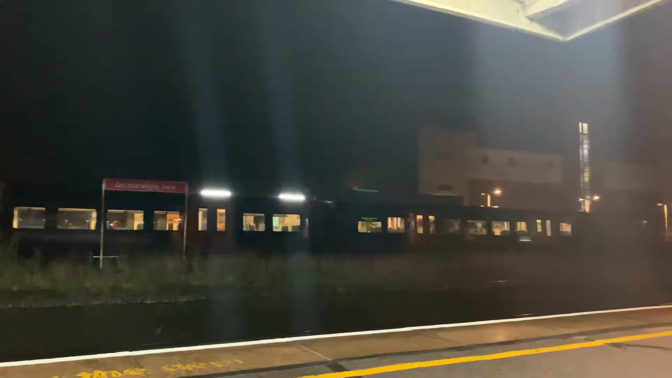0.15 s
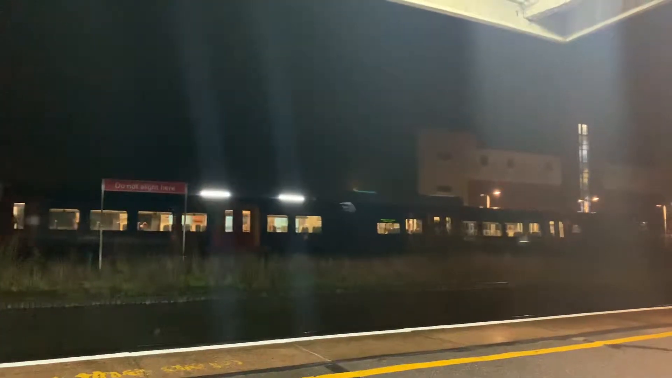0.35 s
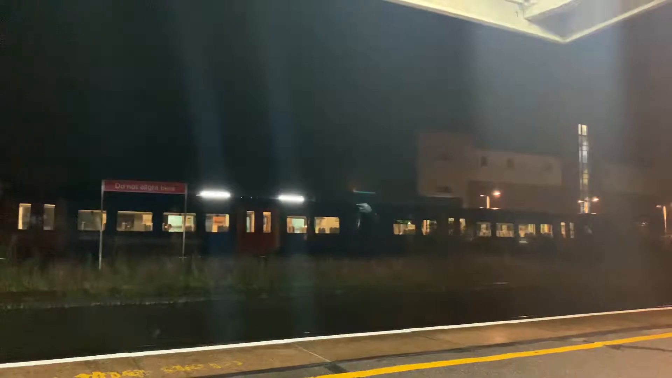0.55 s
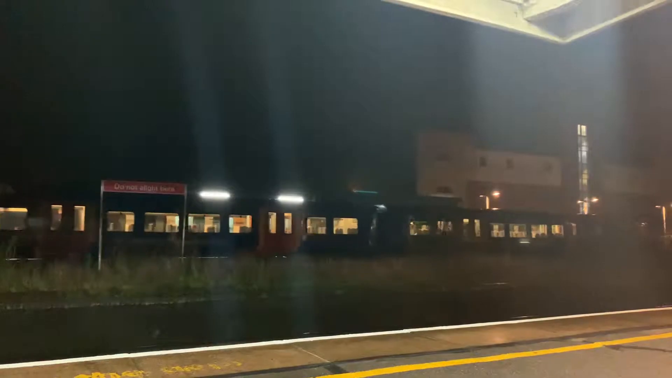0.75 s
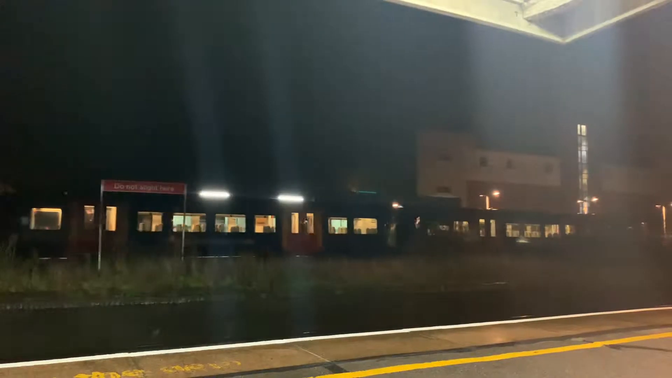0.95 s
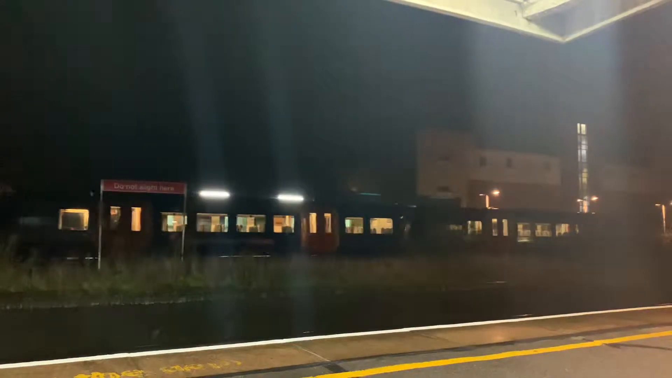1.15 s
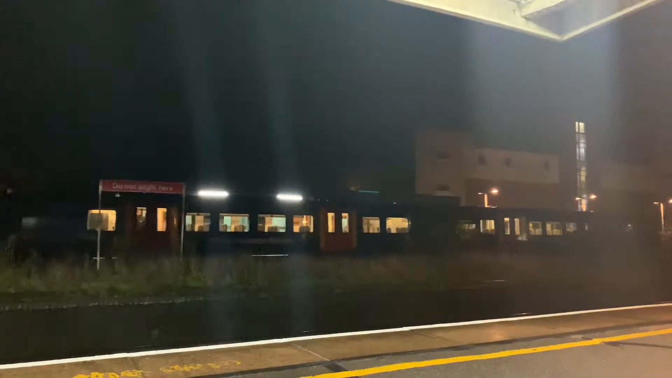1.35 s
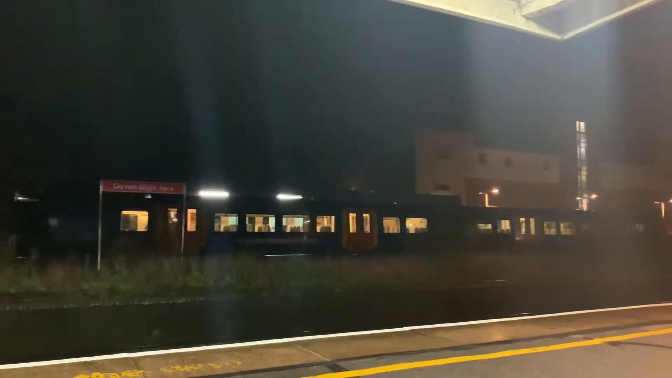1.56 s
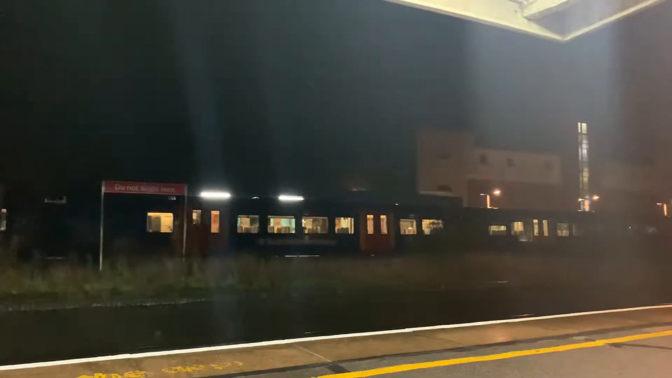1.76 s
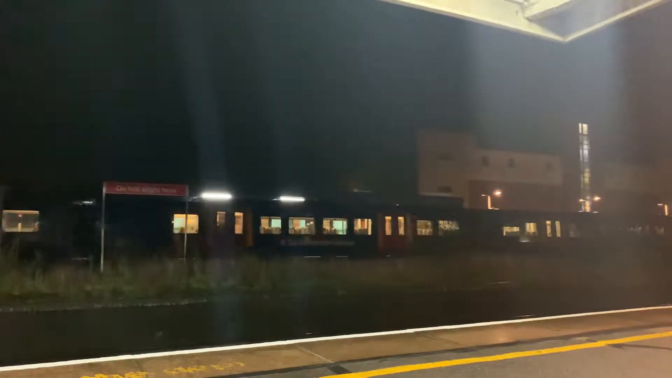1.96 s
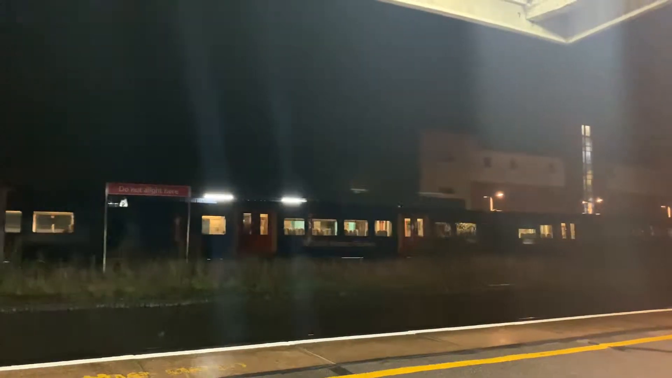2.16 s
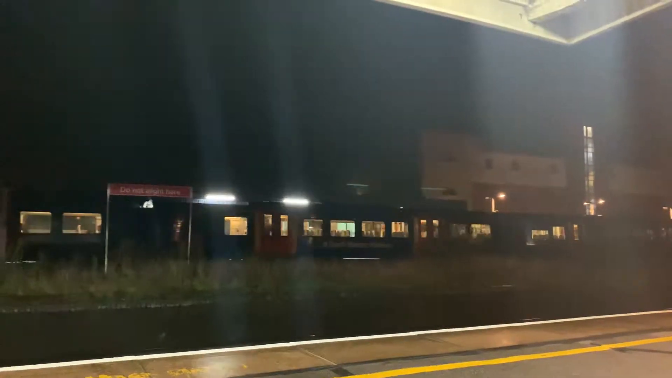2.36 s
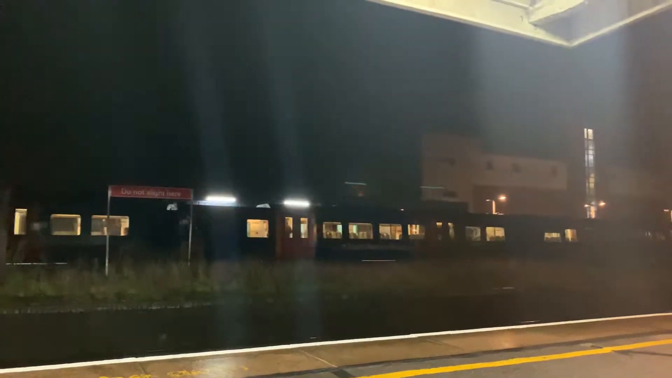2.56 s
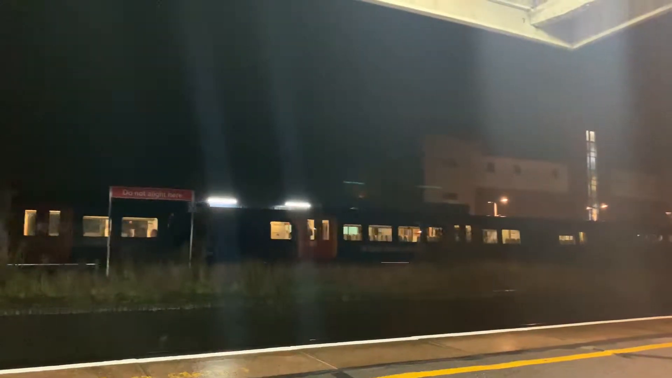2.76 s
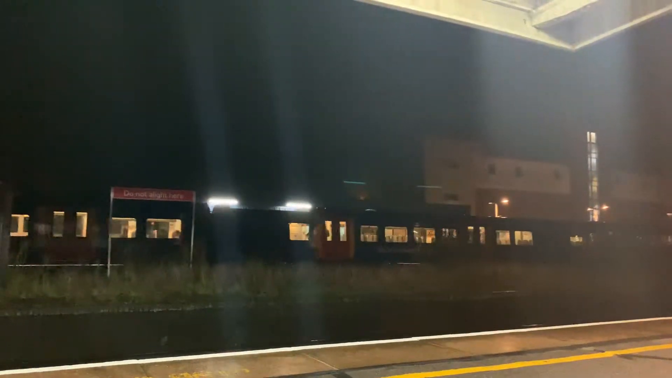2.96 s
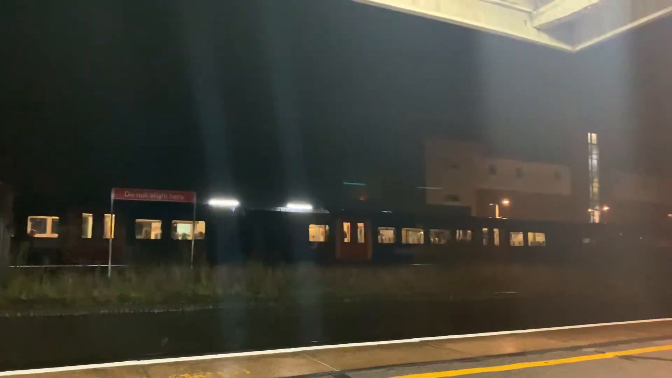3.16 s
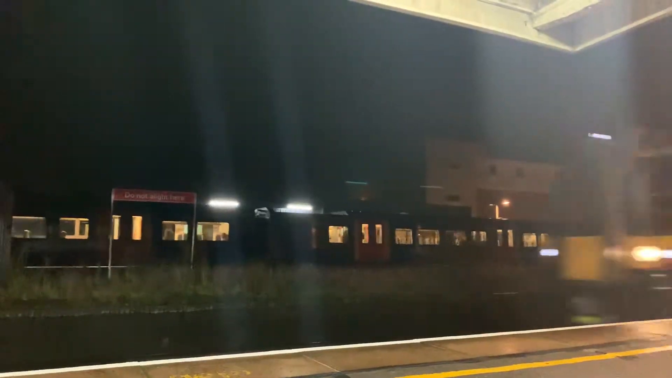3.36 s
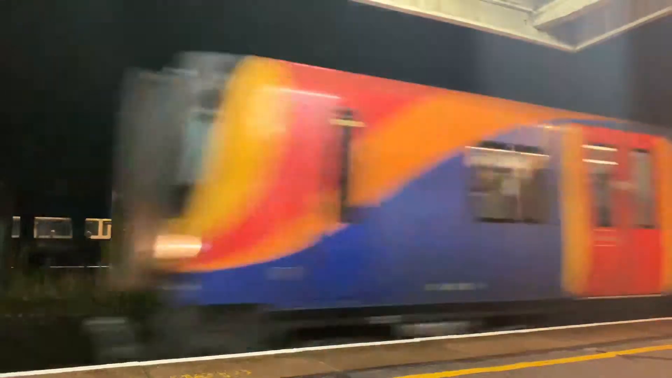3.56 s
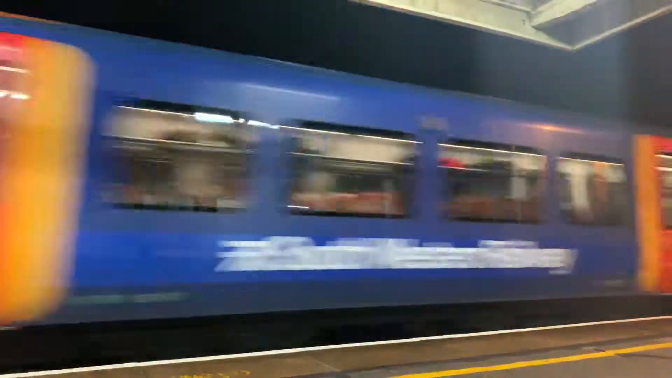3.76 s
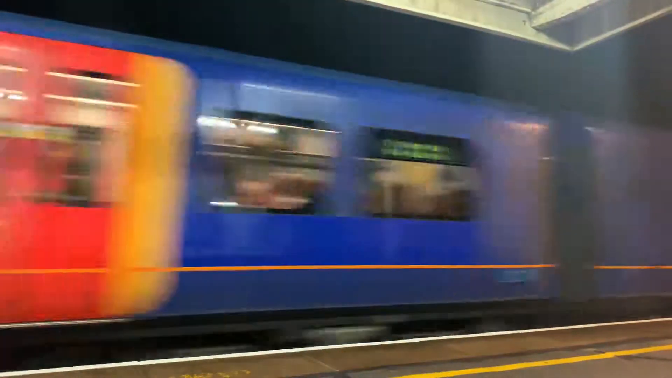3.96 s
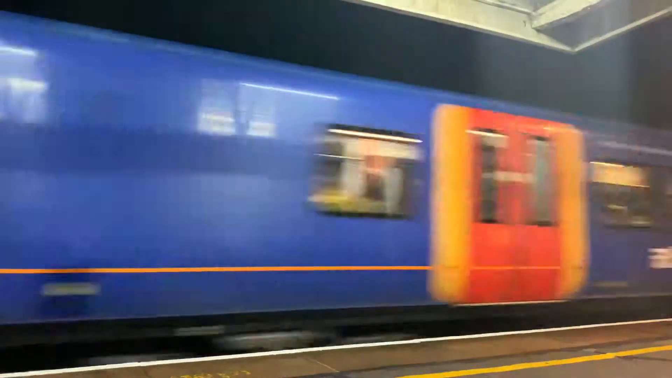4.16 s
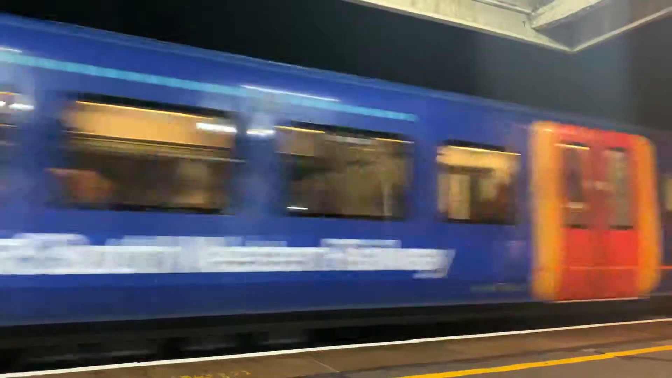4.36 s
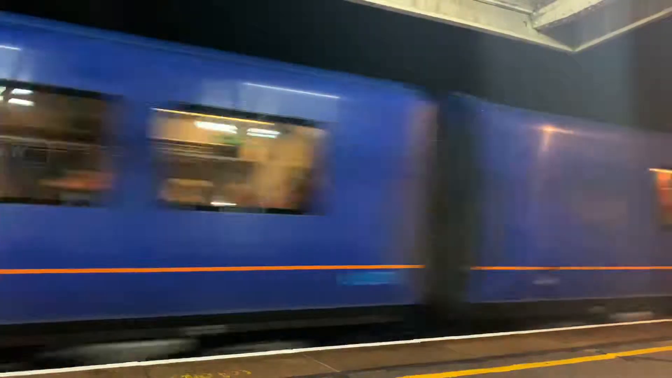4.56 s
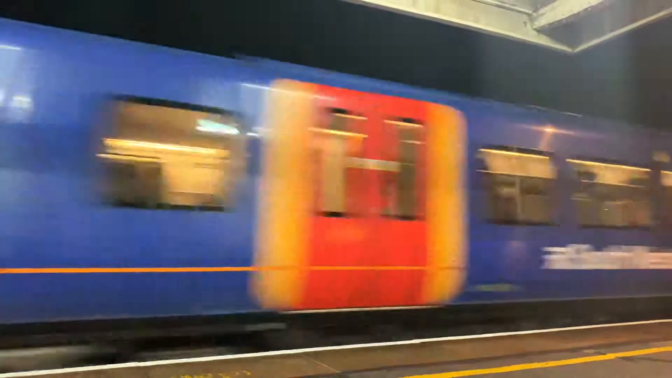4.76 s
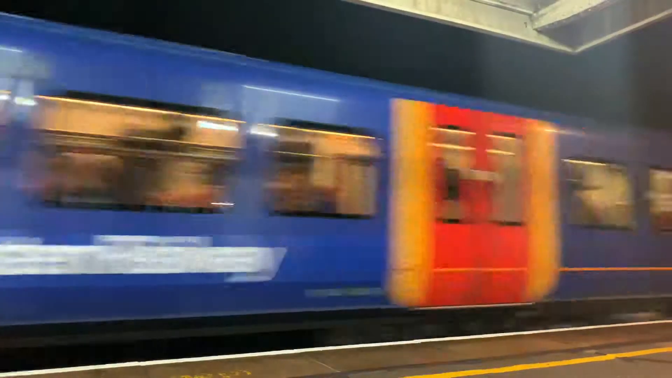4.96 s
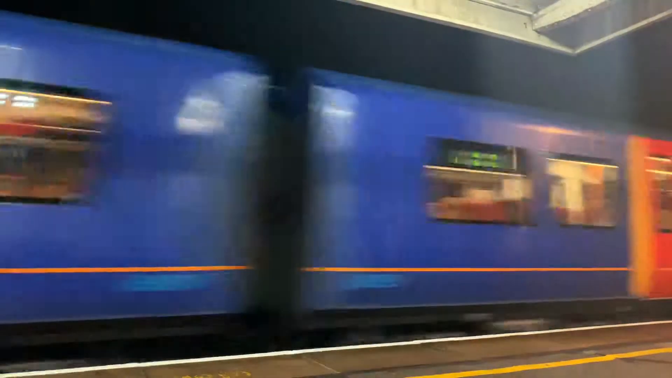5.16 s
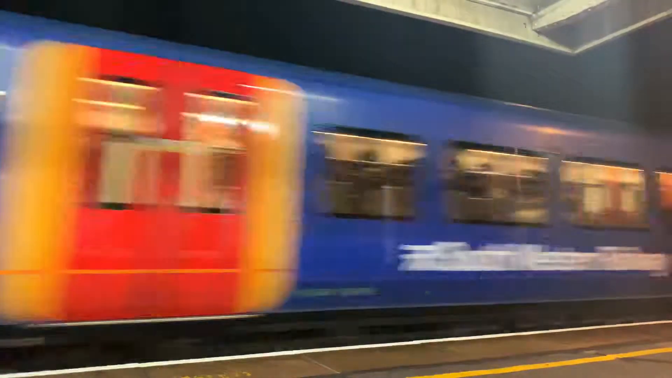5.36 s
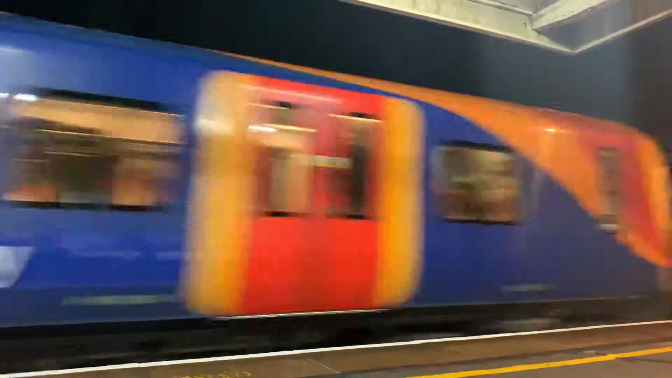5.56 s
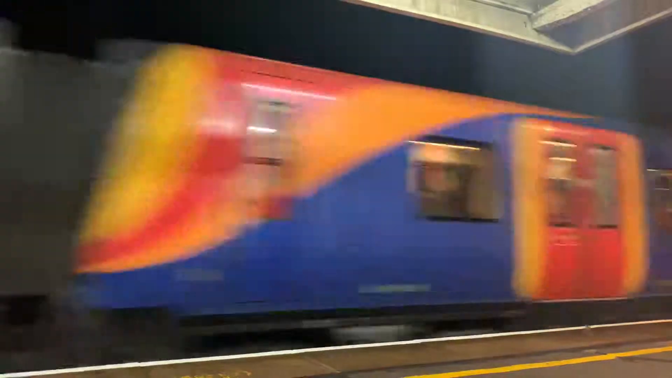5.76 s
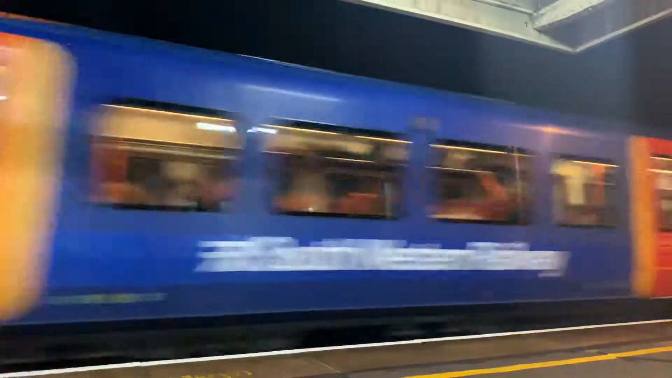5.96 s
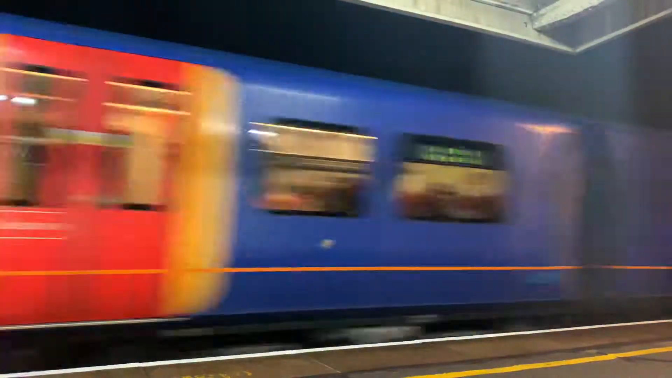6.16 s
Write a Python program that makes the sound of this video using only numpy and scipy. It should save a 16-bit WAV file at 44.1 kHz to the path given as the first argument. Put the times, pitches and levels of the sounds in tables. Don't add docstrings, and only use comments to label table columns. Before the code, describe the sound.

A handheld phone on a station platform first catches dull, distant train rumble and a wavering high whine. Four axles of an approaching train clack over a joint, each blow followed by bright sizzling rail hiss. Singing rails swell steeply into a loud, wide rush of wheels alongside, rough and fluttering, with heavy bass, ringing steel and irregular knocks; it never recedes.

```python
import sys
import numpy as np
from scipy import signal
from scipy.fft import rfft, irfft, next_fast_len
from scipy.io import wavfile
from scipy.ndimage import uniform_filter1d

SR = 44100
rng = np.random.default_rng(int(sys.argv[2]) if len(sys.argv) > 2 else 0)


def dump_mix(stems):
    frames = np.atleast_2d(stems).T
    limited = np.clip(frames, -1, 1)
    pcm = np.round(limited * 32767).astype(np.int16)
    wavfile.write(sys.argv[1], SR, pcm)


def makeup_ratio(level_db):
    decades = np.asarray(level_db, float) / 20
    return 10 ** decades


N = 274107

SIZE = next_fast_len(N)
HZ = np.fft.rfftfreq(SIZE, 1 / SR)


def along(table, x):
    first, *rest = np.transpose(table)
    return [np.interp(x, first, column) for column in rest]


def colour_db(points, hz):
    point_hz, point_db = np.transpose(points)
    return np.interp(np.log(hz + 1), np.log(point_hz), point_db)


# pitch in Hz, left minus right in dB.
PORT_SHADE = [(60, 0), (150, -1.7), (300, 0), (800, 1.7), (2500, 1), (5000, -3.5), (7000, 0), (16000, 0)]
# pitch in Hz, share from 0 to 1,
# left port's delay in half cycles.
CASE_PATH = [(400, 0, 0), (700, .35, 0), (1100, 0, 0), (5900, 0, -.5), (7300, .42, -.1), (8300, .7, .2),
             (9600, .96, .72), (10600, .96, 1), (13750, .96, 2), (16000, .96, 2.75)]


def two_ports(lag):
    case, half_turns = along(CASE_PATH, HZ)
    through_air = (1 - case) * np.exp(-2j * np.pi * HZ * lag / SR)
    through_case = case * np.exp(-1j * np.pi * half_turns)
    left = (through_air + through_case) / np.hypot(case, 1 - case)
    shade = makeup_ratio(colour_db(PORT_SHADE, HZ) / 2)
    return np.array([left * shade, 1 / shade])


def heard(x, lag):
    return irfft(rfft(x, SIZE) * two_ports(lag), SIZE)[:, :N]


def noise_spectrum():
    return rng.standard_normal((len(HZ), 2)) @ [1, 1j]


# pitch in Hz, unrelated part in dB.
LOOSE_BASS = [(30, -28), (80, -26), (160, -13), (300, -17), (500, -45)]


def scattered(shape_db, ways):
    total = sum(makeup_ratio(2 * db) for _, db in ways)
    waves = sum(makeup_ratio(db) * two_ports(lag) * noise_spectrum() for lag, db in ways)
    waves += np.sqrt(total) * makeup_ratio(colour_db(LOOSE_BASS, HZ)) * noise_spectrum() * [[1], [-1]]
    power = total * 2 / SIZE
    return irfft(waves * makeup_ratio(shape_db) / np.sqrt(power), SIZE)[:, :N]


PART_BORDERS_HZ = [400, 1600, 2800]


def by_part(values, hz):
    borders = np.outer(PART_BORDERS_HZ, [.88, 1.12]).ravel()
    place = np.interp(hz, borders, np.repeat(np.arange(len(values)), 2)[1:-1])
    low = np.minimum(place.astype(int), len(values) - 2)
    share = (place - low).reshape((-1,) + (1,) * (np.ndim(values) - 1))
    return (1 - share) * values[low] + share * values[low + 1]


def roughness(points, rings, ways):
    db = colour_db(points, HZ)
    db += sum(gain_db / (1 + (2 * (HZ - hz) / width) ** 2) for hz, width, gain_db in rings)
    part = np.searchsorted(PART_BORDERS_HZ, HZ)
    part_db = 10 * np.log10(np.bincount(part, makeup_ratio(2 * db)) / len(HZ))
    return scattered(db - by_part(part_db, HZ), ways)


# pitch in Hz, level in dB per Hz.
FAR_COLOUR = [(20, 0), (45, 2), (100, -0.5), (150, -6.5), (350, -11), (500, -19), (1000, -18.5),
              (1500, -21), (2200, -25), (3000, -31.5), (6000, -43.5), (8300, -50), (10000, -75),
              (16500, -64)]
# pitch in Hz, width in Hz, boost in dB.
FAR_PEAKS = [(96, 23, 0), (1906, 220, 5.5), (2550, 95, 8), (5350, 1600, 2.5), (6650, 550, 5.5),
             (11600, 200, 21), (14000, 2500, 4)]
# left port's delay in samples, level in dB.
FAR_DIRECTIONS = [(12.5, -5.5), (4, -5.5), (-8.5, -9.5), (-20.5, -9.5)]


def slow_train():
    return roughness(FAR_COLOUR, FAR_PEAKS, FAR_DIRECTIONS)


# pitch in Hz, level in dB per Hz.
COMING_COLOUR = [(20, -5), (50, -2), (90, -4), (170, -5.5), (320, -6), (450, -13), (1000, -12.5),
                 (1600, -15), (2300, -11), (3300, -28.5), (5600, -31), (8000, -33), (11000, -37.5),
                 (16500, -44.5)]
# pitch in Hz, width in Hz, boost in dB.
COMING_RESONANCES = [(587, 21, 7), (1884, 340, 11.5), (2560, 150, 7.5), (6600, 1800, -0.5)]


def fast_train_coming():
    return roughness(COMING_COLOUR, COMING_RESONANCES, FAR_DIRECTIONS)


# pitch in Hz, level in dB per Hz.
NEAR_COLOUR = [(20, -1), (60, 0.5), (150, -3), (300, -1.5), (480, -6), (750, -8.5), (1300, -8.5),
               (1550, -12), (2600, -19.5), (2900, -18.5), (3500, -18.5), (5600, -22), (9000, -24),
               (16500, -33.5)]
# pitch in Hz, width in Hz, boost in dB.
NEAR_RESONANCES = [(90, 7.1, -1.5), (242, 200, 1.5), (567, 66, 6.5), (642, 36, 6.5), (818, 54, 3.5),
                   (1130, 310, 5.5), (2260, 23, 5.5), (2440, 390, 4.5), (4630, 930, 0.5)]
# left port's delay in samples, level in dB.
NEAR_DIRECTIONS = [(-19.5, -1), (-11, -5.5), (-1.5, -2.5), (8, -2), (18.5, -8.5)]


def coaches_alongside():
    return roughness(NEAR_COLOUR, NEAR_RESONANCES, NEAR_DIRECTIONS)


def patches(shape, frames, bins):
    field = rng.standard_normal(shape)
    for _ in range(2):
        field = uniform_filter1d(field, frames, axis=1)
        field = uniform_filter1d(field, bins, axis=0)
    return field / field.std()


# track, rail, wheel, hiss.
# The slow train, in dB.
SLOW_TRAIN_DB = [-42.5, -47, -60.5, -65]
ALONGSIDE_DB = [-18, -14.5, -20.5, -25.5]
NOSE_DB = [6.5, -1.5, -1, 3]
NOSE_FADE_S = [0.32, 0.096, 0.36, 0.97]
AIR_LOSS_DB = [0.84, 3.4, 1.1, 5.8]
# time in seconds, half length in seconds, strength from 0 to 1.
CABS_PASS = [
    (5.9, 0.21, 0.9),
]
BOGIES_PASS = [
    (3.37, 0.083, 0.63),
    (3.6, .08, 1),
    (4.15, 0.14, 0.27),
    (5.7, 0.24, 0.6),
]
MOTORS_PASS = [
    (4.35, 0.45, 0.84),
    (5.4, 0.089, 0.37),
    (5.8, 0.47, 0.35),
]


def part_levels(s):
    speed_m_s, arrives_s, reach_m = 32.9, 3.64, 8
    past_joint_db, past_joint_s = [-.5, 3, 2, 4.5], 0.14
    column = lambda values: np.array(values)[:, None]
    away_m = speed_m_s * np.clip(arrives_s - s, 0, None)
    db = column(ALONGSIDE_DB) - 20 * np.log10(np.hypot(away_m / reach_m, 1))
    db = db - column(AIR_LOSS_DB) * away_m / 100
    db += column(NOSE_DB) * np.exp(-np.clip(s - arrives_s, 0, None) / column(NOSE_FADE_S))
    db -= column(past_joint_db) * np.clip(1 - (s - AXLE_HITS[0][0]) / past_joint_s, 0, 1)
    passing = [(CABS_PASS, [4, -1.5, 1, 0]), (BOGIES_PASS, [0.37, 3.1, 0.89, 1.8]),
               (MOTORS_PASS, [1.5, 0.6, 3.5, .5])]
    for events, part_db in passing:
        db += column(part_db) * sum(size * np.exp(-((s - at) / half) ** 2) for at, half, size in events)
    return 10 * np.log10(makeup_ratio(2 * db) + makeup_ratio(2 * column(SLOW_TRAIN_DB)))


# time in seconds, fast train's share from 0 to 1,
# part of that share alongside from 0 to 1.
TRAIN_SHARES = [
    (0, 0.014, 0.16),
    (1.2, 0.21, 0.3),
    (2.2, 0.86, 0),
    (3.2, 1, 0.06),
    (3.6, 1, 0.17),
    (3.95, 0.98, 0.96),
]


def rolling():
    fast, beside = np.clip(along(TRAIN_SHARES, np.arange(N) / SR), 0, 1)
    x = np.sqrt(1 - fast) * slow_train()
    x += np.sqrt(fast * (1 - beside)) * fast_train_coming()
    x *= makeup_ratio(-0.6 / 2 * np.array([[1], [-1]]))
    x += np.sqrt(fast * beside) * coaches_alongside()
    hz, s, z = signal.stft(x, SR, nperseg=1024, noverlap=768)
    uneven = 0.16 * patches(z.shape[1:], frames=16, bins=60)
    uneven += 1.18 * patches(z.shape[1:], frames=4, bins=8)
    uneven += 1.78 * patches(z.shape[1:], frames=16, bins=2)
    db = by_part(part_levels(s), hz) + uneven * np.clip(hz / 900, 0, 1)[:, None]
    return signal.istft(z * makeup_ratio(db), SR, nperseg=1024, noverlap=768)[1][:, :N]


# time in seconds, pitch in Hz, level in dB.
MOTOR_WHINE = [
    (0, 1794, -55.5),
    (1, 1764, -49.5),
    (2, 1764, -45),
    (2.9, 1794, -45),
    (3.4, 1810, -36),
    (3.6, 1830, -80),
]


def motor():
    hz, db = along(MOTOR_WHINE, np.arange(N) / SR)
    waver = patches((2, N), frames=1500, bins=1)
    turns = np.cumsum(hz + 6 * waver[1]) / SR
    tone = np.sqrt(2) * makeup_ratio(db + 3.8 * waver[0]) * np.sin(2 * np.pi * turns)
    return heard(tone, 6.6)


# time in seconds, peak in dB, treble minus peak in dB, run-in in dB, hiss in dB.
AXLE_HITS = [
    (1.304, -19.5, -12.5, 2.5, -34),
    (1.409, -18.5, -22, 2.5, -40),
    (1.687, -16, -16.5, -1, -34.5),
    (1.796, -21, -15, .3, -37),
]
# pitch in Hz, level in dB.
RAIL_HISS_COLOUR = [(1500, 6.5), (3000, -3), (4500, -1.5), (5800, -7), (7500, 1), (9500, -6.5),
                    (13000, -11), (16500, -33)]


def rail_hiss():
    t = np.arange(N) / SR
    hiss_steps, t60_s = [(0.05, -3.5), (0.027, 4.5)], 0.84
    power = np.zeros(N)
    for axle_s, *_, db in AXLE_HITS:
        for lead_s, step_db in hiss_steps:
            since = t - (axle_s - lead_s)
            fade = makeup_ratio(2 * (db + step_db) - 120 * np.clip(since, 0, None) / t60_s)
            power += fade * np.clip(since / 0.0086, 0, 1)
    hiss = scattered(colour_db(RAIL_HISS_COLOUR, HZ), FAR_DIRECTIONS[:2])
    return np.sqrt(power) * hiss / hiss.std()


def ring(x, modes):
    t = np.arange(SR // 4) / SR
    body = np.zeros(len(t))
    for k, (hz, db, t60) in enumerate(modes):
        body += (-1) ** k * makeup_ratio(db - 60 * t / t60) * np.sin(2 * np.pi * hz * t)
    return signal.fftconvolve(x, body)[:N]


# pitch in Hz, level in dB, time to fall 60 dB in seconds.
RAIL_NOTES = [(303.2, -10, 0.14), (448, -13.5, 0.11), (568, -4, 0.03), (641, 0.5, 0.082),
              (708, -0.5, 0.043), (823, -2.5, 0.034), (1220, -5, 0.033), (1760, -6, 0.034),
              (2244, -8.5, 0.069), (2924, -10, 0.044)]
# pitch in Hz, level in dB, time to fall 60 dB in seconds.
WHEEL_NOTES = [(3300, -2, .02), (3840, -3, .02), (4440, 3, 0.014), (5130, 4, .011), (5700, -2, .011),
               (7100, 5, 0.041), (7700, -0.5, .03), (8260, -6, .02)]


def blows(events, push_s, lag):
    s, db, treble_db = np.transpose(events)
    k = np.arange(600)
    push = np.exp(-k / (push_s * SR)) / (push_s * SR) + np.zeros((len(s), 1))
    rattle = rng.standard_normal((len(s), len(k))) * np.exp(-k / (0.017 * SR)) / np.sqrt(0.0022 * SR)
    hit = np.zeros((2, N + len(k)))
    at = ((s - .002) * SR).astype(int)[:, None] + k
    np.add.at(hit[0], at, push * makeup_ratio(db)[:, None])
    np.add.at(hit[1], at, rattle * makeup_ratio(db + treble_db)[:, None])
    crack = makeup_ratio(10) * np.diff(hit[1])[:N]
    return heard(ring(hit[0, :N], RAIL_NOTES) + ring(hit[1, :N], WHEEL_NOTES) + crack, lag)


# seconds from the drop, level in dB, extra treble in dB.
AXLE_BOUNCES = [
    (-.024, -16, -1.5),
    (-.014, -3, 0),
    (0, 1, -1.5),
    (.021, -18, 12),
    (.04, -20, 10),
]


def joint():
    events = []
    for s, db, treble_db, run_in_db, _ in AXLE_HITS:
        for dt, step_db, extra_db in AXLE_BOUNCES:
            events.append((s + dt, db + step_db + run_in_db * (dt < 0), treble_db + extra_db))
    return blows(events, .00005, 10.0)


def canopy(x):
    t60_s, echo_db = 0.37, -6.5
    t = np.arange(SR // 2) / SR
    tail = rng.standard_normal((2, len(t))) * makeup_ratio(-60 * t / t60_s) * (t > .006)
    tail = signal.lfilter([1], [1, -.6], tail)
    tail *= makeup_ratio(echo_db) / np.linalg.norm(tail, axis=1, keepdims=True)
    return x + signal.fftconvolve(x, tail, axes=1)[:, :N]


# time in seconds, peak in dB, pitch in Hz.
TRACK_THUDS = [(2.219, -19.5, 54), (2.622, -18, 104.4), (3.47, -12, 274), (3.498, -9, 126),
               (3.661, -6.5, 189), (3.77, -5, 89), (3.991, -9.5, 270), (4.28, -22, 90), (4.69, -11, 242),
               (5.02, -10, 595), (5.12, -10.5, 139.6), (5.35, -11, 55), (5.49, -13, 89), (5.55, -10, 591),
               (5.92, -13, 60.7)]


def track_bed():
    t = np.arange(SR // 3) / SR
    swell = t / 0.036 * np.exp(1 - t / 0.024)
    out = np.zeros(N + len(t))
    for s, db, hz in TRACK_THUDS:
        start = int(s * SR)
        out[start:start + len(t)] += makeup_ratio(db - 1) * swell * np.sin(2 * np.pi * hz * t)
    return heard(out[:N], -8)


# time in seconds, peak in dB.
WHEEL_KNOCKS = [(3.425, -16), (3.579, -6), (3.648, 3), (3.759, -1), (3.966, 1.5), (4.082, -2), (4.562, -11),
                (4.604, 5), (4.664, 4), (4.859, -16), (4.929, -10), (5.029, 1), (5.186, 1.5), (5.253, 3.5),
                (5.354, 0.5), (5.52, -3), (5.578, -1.5), (5.631, 4), (5.688, -10), (5.853, 2), (5.898, 3.5),
                (5.96, 1), (6.044, -1)]


def wheel_knocks():
    return blows([(s, db, -24) for s, db in WHEEL_KNOCKS], .00008, -17.0)


def scene():
    clacks = canopy(makeup_ratio(-3.5) * joint() + makeup_ratio(-14.5) * wheel_knocks())
    return rolling() + motor() + rail_hiss() + clacks + track_bed()


def band_limit(x):
    return signal.sosfilt(signal.butter(12, 15980, fs=SR, output="sos"), x)


def record(dry):
    x = dry + makeup_ratio(-92) * rng.standard_normal(dry.shape)
    x = signal.sosfilt(signal.butter(2, 22, "high", fs=SR, output="sos"), x)
    x = x / (1 + np.abs(x / .98) ** 5) ** (1 / 5)
    return band_limit(x)


dry = scene()
out = record(dry)
dump_mix(out)
```